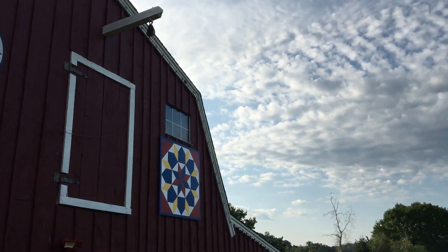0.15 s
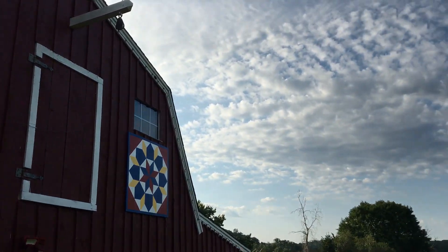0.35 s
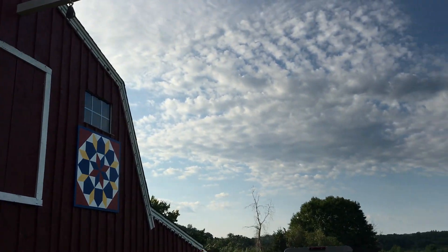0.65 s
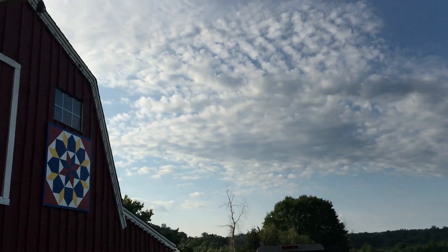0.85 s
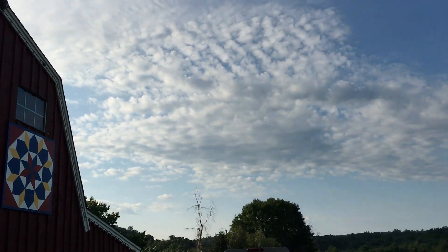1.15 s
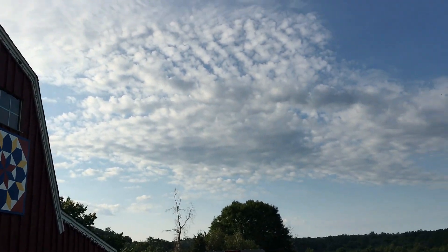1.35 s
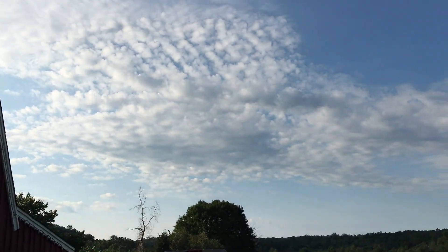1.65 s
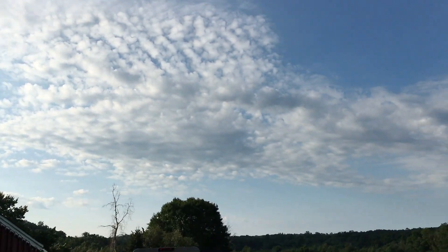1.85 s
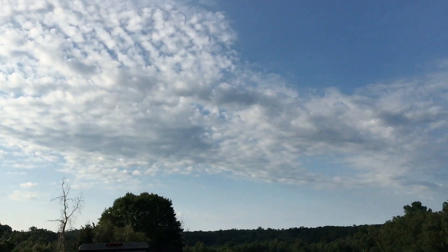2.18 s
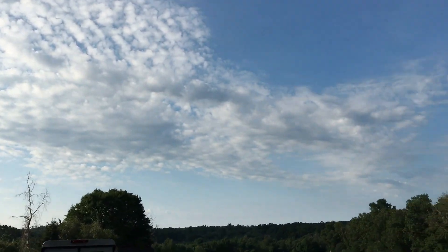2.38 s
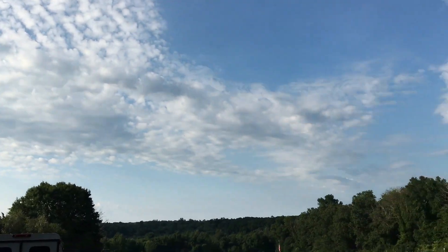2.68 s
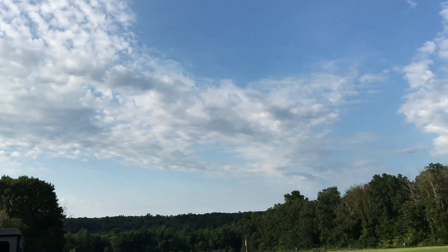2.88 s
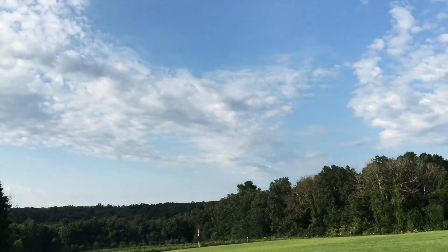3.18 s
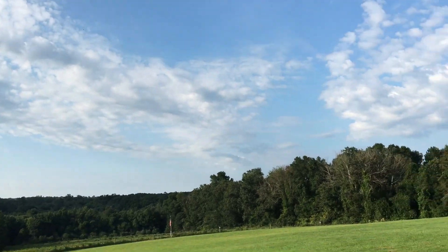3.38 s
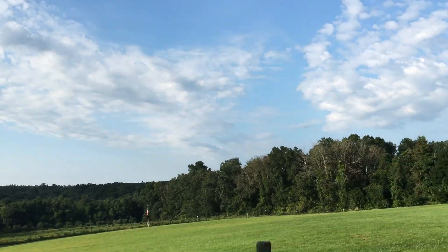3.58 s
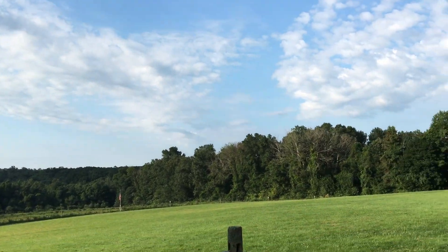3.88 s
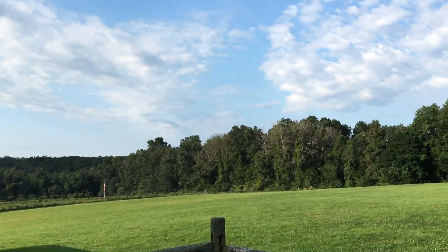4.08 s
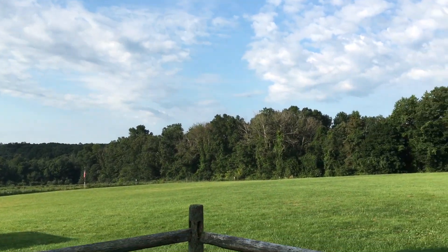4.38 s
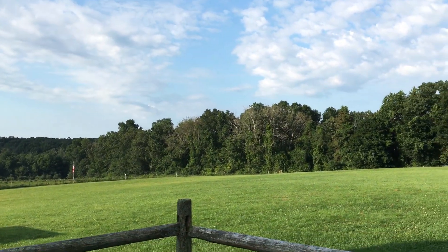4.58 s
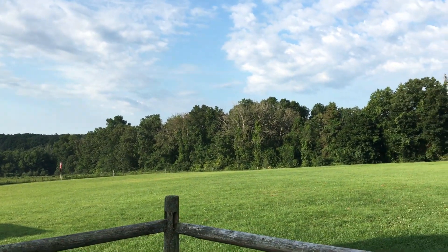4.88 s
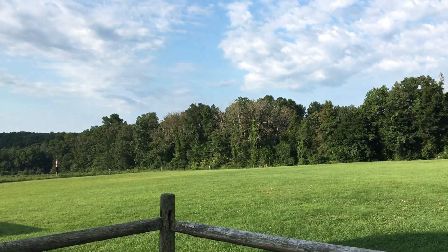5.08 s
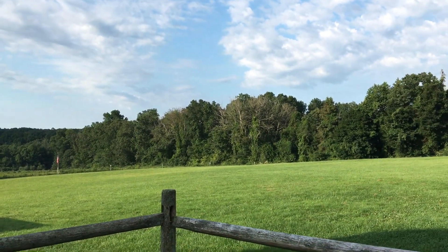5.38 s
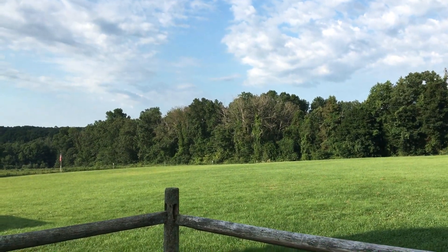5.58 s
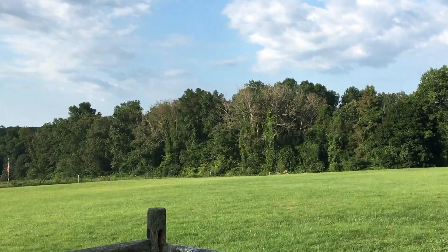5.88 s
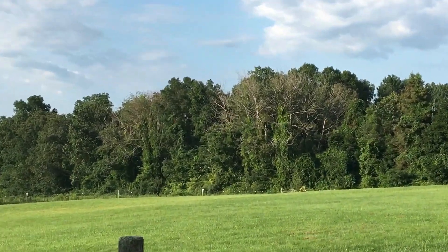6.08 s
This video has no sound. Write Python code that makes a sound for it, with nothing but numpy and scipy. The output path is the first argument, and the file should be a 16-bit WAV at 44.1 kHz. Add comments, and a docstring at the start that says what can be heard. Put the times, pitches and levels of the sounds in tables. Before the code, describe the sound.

Quiet summer countryside heard through a handheld camera: soft low wind, high steady insect shimmer, faint bird whistles and sharp chips, with occasional knocks of the camera body. In the second half a distant young hawk calls, first a rough upward slur, then two strained cries about a second apart that jump to a shrill whistle, each trailing an echo from the woods.

```python
"""The edge of a wood seen across a field: from the start, low wind and a far hum lie under summer insects,
with thin whistles of far birds, then chips and peeps. Camera ticks come from 0.6 s, as it turns in the hand.
At 3.4 s a young hawk gives a hoarse rising slur of ragged partials; its cries at 4.5 s and 5.4 s break into
a piercing, buzzing whistle. Trees echo hawk and birds. Wind and chorus are shaped noise, voices gliding tones."""
import sys
import numpy as np
from scipy import signal
from scipy.fft import rfft, irfft, next_fast_len
from scipy.io import wavfile
from scipy.ndimage import uniform_filter1d, map_coordinates

SR = 44100
rng = np.random.default_rng(int(sys.argv[2]) if len(sys.argv) > 2 else 0)


def transcribe(signal):
    """Save signal, clipped to [-1, 1], as a 16-bit WAV file at the path in sys.argv[1]."""
    frames = np.atleast_2d(signal).T
    limited = np.clip(frames, -1, 1)
    pcm = np.round(limited * 32767).astype(np.int16)
    wavfile.write(sys.argv[1], SR, pcm)


N = 275095

# slow course of the wind: start_s, rumble_db, air_db
WIND_LEVELS = [(0, -44, -57.5), (2.2, -43.5, -57.5), (2.7, -44, -56), (3.4, -43.5, -56.5),
               (6.24, -42.5, -57)]
# spectrum shapes of the low wind and of the open field: frequency_hz, density_db (relative, per Hz)
RUMBLE_SHAPE = [(15, -45), (25, -25), (40, -9), (57, 4), (75, -2.5), (105, -2.5), (125, -6.5), (185, -11),
                (215, -18), (290, -34), (450, -59)]
AIR_SHAPE = [(140, -23.5), (230, -2.5), (309, -1), (347, -1), (455, -8), (597, -7), (636, -7.5), (867, -8),
             (1230, -13), (2630, -18), (2950, -20.5), (3490, -20), (5000, -23), (6500, -56.5),
             (11000, -120)]
# course of the far hum: start_s, level_db
HUM_LEVELS = [(0, -50.5), (1.8, -43.5), (3.1, -51), (3.4, -41.5), (4.7, -42), (6.24, -49)]
GUST_DB, FLUTTER_DB = 1.6, .5  # random swing of the rumble and of the air

# spectrum shape of far insects and leaves: frequency_hz, density_db (relative, per Hz)
CHORUS_SHAPE = [(3500, -67), (5050, -12), (5450, 0.5), (6100, -3.5), (6850, 2), (7450, -1), (8100, -9),
                (9500, -12.5), (10400, -17), (11500, -13.5), (15800, -18)]
# short zips of a katydid: start_s, level_db
KATYDID_ZIPS = [(0, -65), (.23, -68), (.78, -67), (1.04, -68), (1.49, -64), (1.81, -66), (2.12, -69),
                (3.02, -68), (4.23, -68), (4.99, -65), (5.401, -63), (5.72, -64), (6.04, -63)]
TRILL_DB = -59.5

# thin falling whistles from far off: start_s, length_s, middle_pitch_hz, level_db
FAR_WHISTLES = [(0, .17, 3470, -64), (0, 0.43, 2630, -70.5), (0.149, 0.21, 3254, -67.5),
                (0.661, 0.13, 3430, -70), (0.868, .04, 3750, -71), (2.603, 0.1, 2470, -63.5),
                (2.616, 0.095, 3740, -64), (2.732, 0.21, 3424, -66.5)]
FAR_FALL, FAR_OCTAVE_DB = 0.0265, -23  # share above the middle at the start, and below it at the end
# strokes of sharp bird chips, the chip at 4.22 s in several strokes with close echoes:
# start_s, length_s, start_pitch_hz, middle_pitch_hz, end_pitch_hz, level_db, octave_db (re the tone)
CHIP_STROKES = [(.926, .035, 3320, 3180, 3030, -67, -20), (1.221, 0.028, 4850, 4100, 3580, -49, -27),
                (1.227, 0.026, 3530, 3086, 3015, -46.5, -0.5), (1.38, 0.023, 3860, 4270, 4200, -67, -22),
                (1.555, 0.026, 2840, 3500, 4030, -62, -24), (4.224, 0.013, 2960, 4000, 4860, -49, -30),
                (4.233, 0.035, 4830, 6300, 5700, -56.5, -32), (4.235, .018, 3080, 4200, 4650, -43.5, -27),
                (4.255, 0.021, 4650, 4050, 2320, -41, -27), (4.276, 0.021, 4540, 4390, 3180, -49.5, -32),
                (5.556, .024, 6320, 5950, 6270, -50, -29)]
# soft arched peeps of another bird: start_s, top_pitch_hz, level_db
SOFT_PEEPS = [(2.008, 1860, -62.5), (2.129, 1935, -55.5), (2.268, 1900, -63), (2.362, 2170, -56),
              (2.528, 2040, -62), (2.875, 1920, -58), (3.085, 1910, -62), (3.272, 1900, -61),
              (4.813, 1900, -56.5), (5.109, 2000, -61)]
PEEP_S, PEEP_ARCH, PEEP_OCTAVE_DB = 0.048, 0.102, -30  # length; both ends lie this share below the top
# decay of the deep wood's echo, longest near 5 kHz: frequency_hz, t60_s
WOOD_DECAY = [(500, 0.27), (3200, 1.19), (5000, 2.2), (10000, 0.057)]

# ticks of the camera in the hand: start_s, level_db, ring_hz, t60_s
HANDLING_TICKS = [(0.6275, -33, 2350, 0.012), (0.629, -44, 4600, .01), (0.7236, -31.5, 1670, 0.0045),
                  (2.132, -32, 5300, 0.002), (2.5016, -25, 1530, 0.0054), (2.9537, -23, 860, 0.0045),
                  (2.953, -43, 3600, 0.0031), (3.89, -40.5, 1350, .018), (5.554, -40, 1850, 0.017),
                  (5.551, -32, 4330, 0.0057)]
THUD_HZ, THUD_DB, THUD_S = 304, -13.5, 0.022  # camera body: pitch, level re the tick's level_db, t60

# hoarse cries before the throat's colour: start_s, length_s, held_pitch_hz (before scoop and climb),
# swell_s, starting_level_db, full_level_db, octave_db, rasp_db
HOARSE_CRIES = [(3.37, .602, 2560, 0.49, -49.5, -38.5, -56, -58),
                (4.473, 0.44, 2867, 0.091, -58.5, -36.5, -57, -55),
                (5.382, 0.443, 3040, 0.077, -60.5, -35.5, -59.5, -54)]
# partials of the hoarse voice, which repeats every fourth cycle:
# multiple (of the pitch), level_db (re the rasp), raggedness_rad
QUARTER_PARTIALS = [(.75, -17, 1.5), (1.25, 0, 1.1), (1.5, -3, .9), (1.75, -14, 1.3), (2.25, -17, 1.3),
                    (2.5, -15, 1.2)]
SCOOP, SCOOP_S, CLIMB_HZ_PER_S = .235, 0.075, 145  # starts this share flat, scoops up, then creeps higher
DROP, DROP_S = .23, .017  # the pitch collapses by this share as the cry ends
RELEASE_DB, RELEASE_S = 23, 0.025  # and the voice dies away
FADE_DB, FADE_KNOTS_PER_S = 12, 52  # depth per unit of the random curve, and its pace
# breaks into the whistle register, before the throat's colour: start_s, length_s, pitch_hz,
# crest_rise_hz, crest_half_width_s, level_db
WHISTLE_BREAKS = [(4.564, .326, 3140, 149.4, .088, -37.5), (5.457, .342, 3219, 178, 0.087, -36)]
CREST_LEAD_S, CREST_DB = .066, -1  # effort peaks this long before the end; level change at the peak
BUZZ_DB, BUZZ_GROWS_DB = -21, 11.5  # phase swing at rest (dB re 1 rad), and its gain at full effort
SAG_HZ, SAG_DB, SAG_S = 110, 6.5, .014  # the whistle sags just before it ends
# colour of the hawk's throat: frequency_hz, gain_db
THROAT_COLOUR = [(1200, 20), (1900, 1), (2600, 0.5), (7000, -1), (8400, 8.5), (9400, 9), (10300, -1),
                 (12000, -17)]

TOP_HZ = 15780  # upper band limit of the camera


def amp(db):
    """Decibels to gain."""
    return 10 ** (np.asarray(db) / 20)


def unit(x):
    """Scale to rms 1."""
    return x / np.sqrt(np.mean(x ** 2) + 1e-20)


def along(points, hz):
    """Read (Hz, value) points on a log frequency axis."""
    f, v = np.transpose(points)
    return np.interp(np.log(hz + 1), np.log(f + 1), v)


def clock():
    """The time of every sample."""
    return np.arange(N) / SR


def curves(rows):
    """One value per sample for each column after the time."""
    s, *cols = np.transpose(rows)
    return [np.interp(clock(), s, c) for c in cols]


def wobble(rate):
    """A smooth random curve, rate knots a second."""
    knots = rng.standard_normal(int(N * rate / SR) + 4)
    return map_coordinates(knots, [clock() * rate])


def cycles(hz):
    """The running phase of a frequency curve."""
    return 2 * np.pi * np.cumsum(hz) / SR


def gate(start, end, edge):
    """Open from start to end, with short ramps."""
    return np.clip(np.minimum(clock() - start, end - clock()) / edge + .5, 0, 1)


def nearing(end, span):
    """Grow exponentially to 1 at end, with time constant span, and stay there."""
    return np.exp(np.minimum(clock() - end, 0) / span)


def filtered(x, response):
    """Shape the spectrum of x by a response of frequency."""
    m = next_fast_len(N + SR // 2)
    return irfft(rfft(x, m) * response(np.fft.rfftfreq(m, 1 / SR)), m)[:N]


def rush(spectrum, patchy_db):
    """Coloured noise of rms 1 with patches of random gain in time and frequency."""
    z = signal.stft(rng.standard_normal(N), nperseg=512)[2]
    field = uniform_filter1d(rng.standard_normal(z.shape), 6, 0)
    field = uniform_filter1d(field, 14, 1)
    noise = signal.istft(z * amp(patchy_db * unit(field)), nperseg=512)[1][:N]
    return unit(filtered(noise, lambda hz: amp(along(spectrum, hz))))


def add(track, s, sound):
    """Mix a short sound in at time s."""
    start = max(round(s * SR), 0)
    track[start:start + len(sound)] += sound[:max(N - start, 0)]


def wind():
    """Low gusting noise, the softer rush of the open field and a far hum of wavering pitch."""
    rumble_db, air_db = curves(WIND_LEVELS)
    hum_db, = curves(HUM_LEVELS)
    rumble = amp(rumble_db + GUST_DB * wobble(9.7)) * rush(RUMBLE_SHAPE, patchy_db=0)
    air = amp(air_db + FLUTTER_DB * wobble(5.41)) * rush(AIR_SHAPE, patchy_db=1.24)
    drone = amp(2 * wobble(7)) * np.sin(cycles(84.6 + 2.5 * wobble(8)))
    return rumble + air + amp(hum_db) * drone


def insects():
    """A far noise chorus, a tone pulsed into a ticking trill, and katydid zips of a few wing strokes each."""
    swell = amp(.35 * wobble(2))
    chorus = amp(-61.0) * swell * rush(CHORUS_SHAPE, patchy_db=0.86)
    strokes = np.maximum(np.sin(cycles(14.9 * (1 + .015 * wobble(2)))), 0) ** 2
    trill_tone = np.sin(cycles(7330 + 110 * wobble(700)))
    trill = amp(TRILL_DB + 2 * wobble(2)) * strokes * trill_tone
    zips = sum(amp(db) * gate(s + .01, s + .075, edge=.03) for s, db in KATYDID_ZIPS)
    wing_strokes = .7 + .55 * np.sin(cycles(88 + 3 * wobble(5)))
    wing_tone = np.sin(cycles(8520 + 120 * wobble(900)))
    return chorus + trill + zips * wing_strokes * wing_tone


def songbirds():
    """Each stroke is one arched or sliding, quavering glide with overtones; loud high ones are harsh."""
    out = np.zeros(N)
    quaver, rasp, flicker = wobble(250), wobble(1100), amp(3 * wobble(70))
    far_calls = [(s, length, hz * (1 + FAR_FALL), hz, hz * (1 - FAR_FALL), db, FAR_OCTAVE_DB)
                 for s, length, hz, db in FAR_WHISTLES]
    peeps = [(s, PEEP_S, hz * (1 - PEEP_ARCH), hz, hz * (1 - PEEP_ARCH), db, PEEP_OCTAVE_DB)
             for s, hz, db in SOFT_PEEPS]
    for s, length, start_hz, middle_hz, end_hz, db, octave_db in CHIP_STROKES + peeps + far_calls:
        u = np.linspace(0, 1, int(length * SR))
        stroke = max(int(s * SR), 0) + np.arange(len(u))
        # a parabola through the three pitches
        glide = np.polyval(np.polyfit([0, .5, 1], [start_hz, middle_hz, end_hz], 2), u)
        harsh = .022 * (db > -56 and middle_hz > 2600)
        phase = cycles(glide * (1 + .013 * quaver[stroke] + harsh * rasp[stroke]))
        overtones = np.sin(2 * phase) + 0.37 * np.sin(3 * phase)
        tone = np.sin(phase) + amp(octave_db) * overtones
        swell = np.sqrt(np.abs(np.sin(np.pi * u)))
        add(out, s, amp(db) * flicker[stroke] * swell * tone)
    return out


def trees(x, near_db, far_db, count=14):
    """Near trunks answer one by one; the deep wood's long echo rings longest near 5 kHz.

    The lows and the very top die sooner."""
    hz, t, z = signal.stft(rng.standard_normal(SR * 3 // 2), SR, nperseg=256)
    decay = amp(-60 * t / along(WOOD_DECAY, hz)[:, None])
    far = signal.istft(z * decay, SR, nperseg=256)[1]
    delays = rng.uniform(.005, 0.083, count)
    strengths = rng.choice([-1, 1], count) * np.exp(-delays / 0.033)
    near = np.bincount((delays * SR).astype(int), strengths, len(far))
    echo = amp(near_db) * near / np.linalg.norm(near) + amp(far_db) * far / np.linalg.norm(far)
    return x + signal.fftconvolve(x, echo)[:N]


def handling():
    """Small dead ticks of the camera body under the fingers: a damped ring, each with a soft thud."""
    out, t = np.zeros(N), np.arange(SR // 20) / SR
    thud = amp(THUD_DB - 60 * t / THUD_S) * np.sin(2 * np.pi * THUD_HZ * t)
    for s, db, hz, t60 in HANDLING_TICKS:
        ring = np.sin(2 * np.pi * hz * t) + 0.16 * np.sin(2 * np.pi * hz * 1.26 * t)
        ring = ring + .02 * rng.standard_normal(len(t))
        attack = 1 - np.exp(-t / 0.00016)
        add(out, s, amp(db) * attack * (0.9 * amp(-60 * t / t60) * ring + thud))
    return out


def fading():
    """A gain with brief random dips, where the cry's paths through the air cancel."""
    return amp(FADE_DB * (0.37 - np.maximum(wobble(FADE_KNOTS_PER_S) - .4, 0)))


def slur(start, length, held_hz, swell_s, first_db, full_db, octave_db, hoarse_db):
    """The hoarse rising cry: a tone, its octave and ragged partials at quarter steps."""
    end = start + length
    age = np.clip(clock() - start, 0, length)
    scoop = 1 - SCOOP * np.exp(-age / SCOOP_S)
    drop = 1 - DROP * nearing(end, DROP_S)
    hz = (held_hz + CLIMB_HZ_PER_S * age) * scoop * drop
    release_db = -RELEASE_DB * nearing(end, RELEASE_S)
    db = first_db + (full_db - first_db) * np.minimum(age / swell_s, 1) ** 1.35 + release_db
    opening = (1 - np.exp(-(age + .008) / .02)) * amp(.8 * release_db)
    phase = cycles(hz * (1 + 0.00254 * wobble(130)))
    # the weaker the tone, the rougher it is
    rasp = .05 + np.clip(amp(hoarse_db - db), 0, .45)
    tone = amp(db) * np.sin(phase + rasp * wobble(500))
    tone = tone + opening * amp(octave_db) * np.sin(2 * phase + (.2 + rasp) * wobble(440))
    partials = sum(amp(level + 2 * wobble(40)) * np.sin(k * phase + ragged * wobble(420))
                   for k, level, ragged in QUARTER_PARTIALS)
    # a thin bright edge follows the level of the tone
    edge = amp(db - 36) * np.sin(3 * phase) + amp(db - 39) * np.sin(3.5 * phase + .6 * wobble(420))
    # the fading deepens as the cry goes on
    faded_tone = fading() ** np.sqrt(age / length) * tone
    voice = np.sqrt(2) * (faded_tone + edge + opening * amp(hoarse_db) * partials)
    return voice * amp(1.7 * wobble(130) - .6) * gate(start, end, edge=.016)


def whistle(start, length, held_hz, rise_hz, crest_s, level_db):
    """A clean high tone; toward its crest a slower vibration bends its phase more and makes it buzz."""
    end = start + length
    effort = np.exp(-((clock() - end + CREST_LEAD_S) / crest_s) ** 2)
    sag = nearing(end, SAG_S)
    hz = held_hz + rise_hz * effort - SAG_HZ * sag
    db = level_db + CREST_DB * effort - SAG_DB * sag
    buzz = np.clip(amp(BUZZ_DB + BUZZ_GROWS_DB * effort), 0, .55)
    slow = cycles(hz / 6.1 * (1 + 0.0106 * wobble(200)))
    phase = cycles(hz * (1 + 0.00197 * wobble(120))) - buzz * np.sin(slow) + 0.07 * wobble(1300)
    tone = np.sin(phase) + amp(-21.5) * np.sin(2 * phase) + amp(-36) * np.sin(3 * phase)
    # a husky trace of the lower register dies away after the jump
    husk = amp(-11) * np.exp(-np.abs(clock() - start) / .07) * wobble(300)
    undertone = husk * np.sin(phase - slow)
    voice = np.sqrt(2) * ((1 + 0.5 * buzz * np.cos(slow)) * tone + undertone)
    return voice * fading() ** effort * amp(db + 0.6 * wobble(50)) * gate(start, end, edge=.006)


def hawk():
    """The hoarse and whistling registers take turns in one throat, which colours both."""
    whistling = sum(gate(s, s + length, edge=0.0041) for s, length, *_ in WHISTLE_BREAKS)
    hoarse = (1 - whistling) * sum(slur(*row) for row in HOARSE_CRIES)
    voice = hoarse + sum(whistle(*row) for row in WHISTLE_BREAKS)
    return filtered(voice, lambda hz: amp(along(THROAT_COLOUR, hz)))


def scene():
    """Hawk and small birds among the trees, over the sounds of the field and the hand on the camera."""
    song = trees(songbirds(), near_db=-6, far_db=-15.5)
    cries = trees(hawk(), near_db=-15.5, far_db=-15)
    return (wind() + insects() + song + handling() + cries)[None]


def record(dry):
    """The camera keeps nothing above its band limit."""
    return filtered(dry[0], lambda hz: hz < TOP_HZ)[None]


dry = scene()
out = record(dry)
transcribe(out)
```